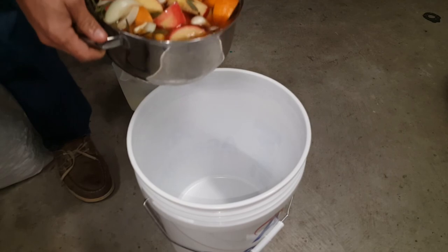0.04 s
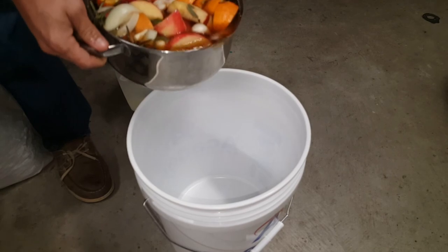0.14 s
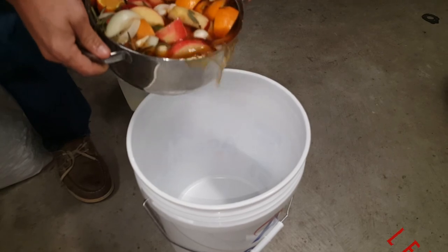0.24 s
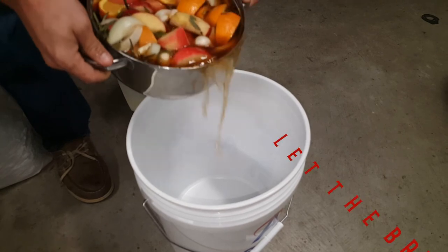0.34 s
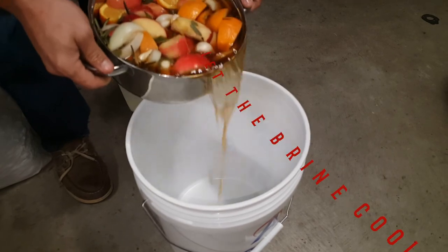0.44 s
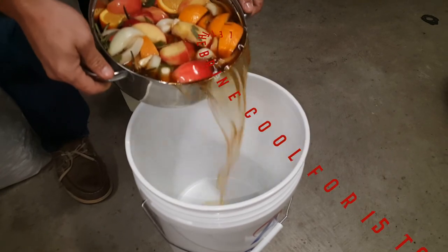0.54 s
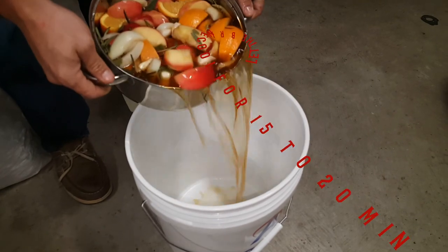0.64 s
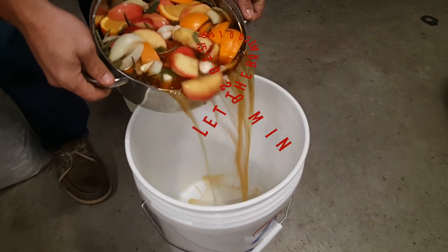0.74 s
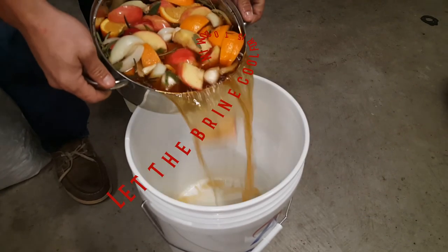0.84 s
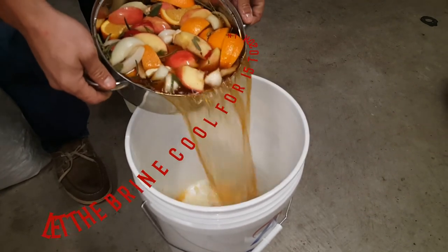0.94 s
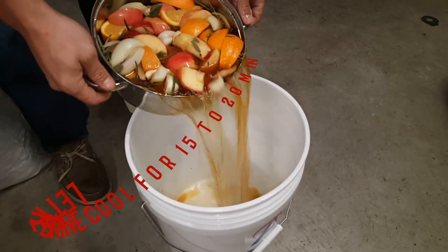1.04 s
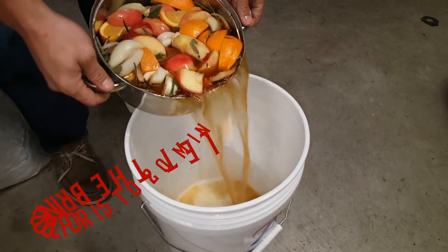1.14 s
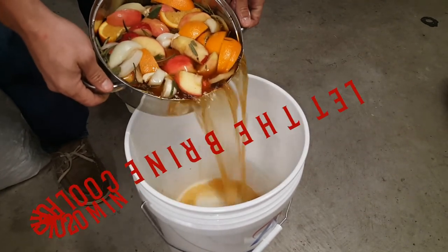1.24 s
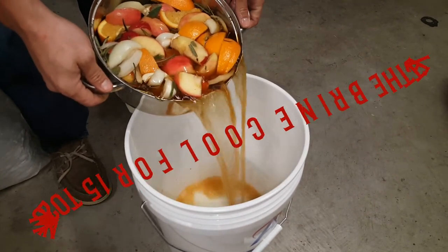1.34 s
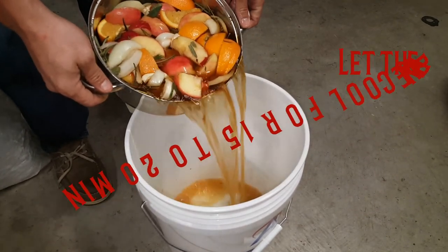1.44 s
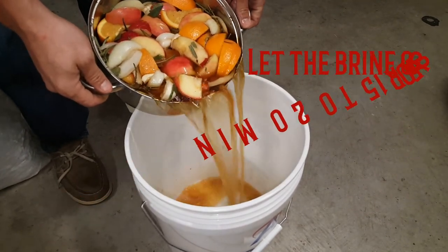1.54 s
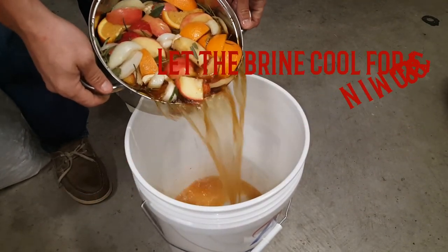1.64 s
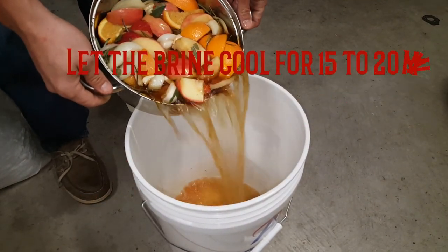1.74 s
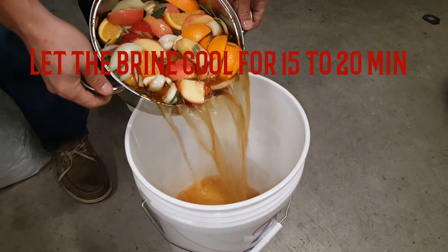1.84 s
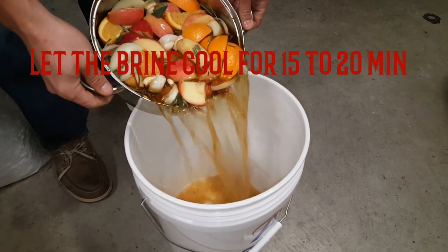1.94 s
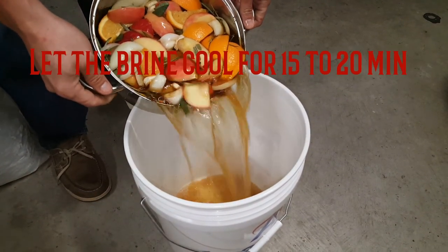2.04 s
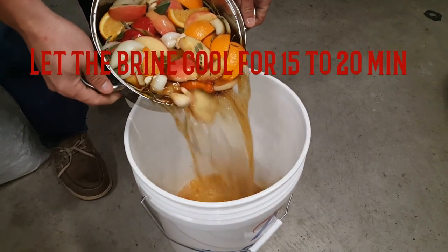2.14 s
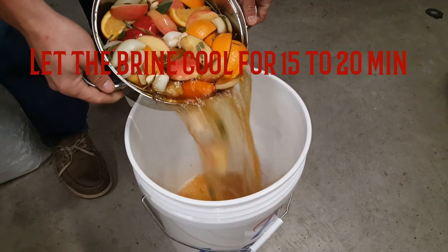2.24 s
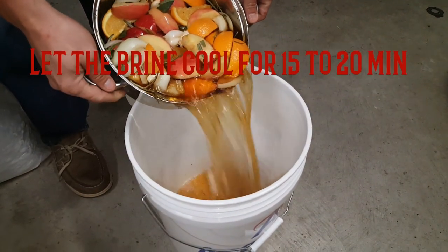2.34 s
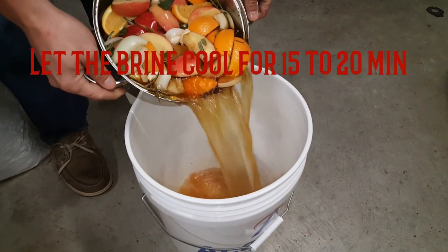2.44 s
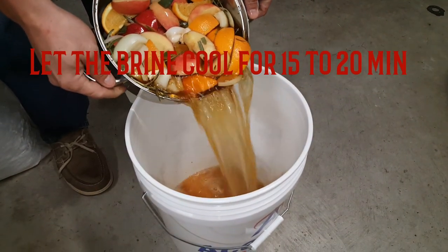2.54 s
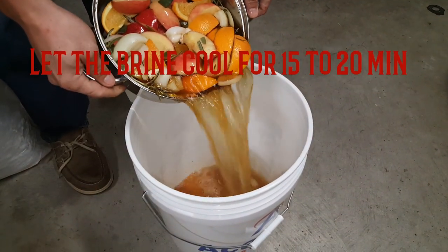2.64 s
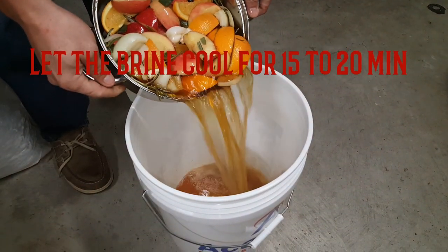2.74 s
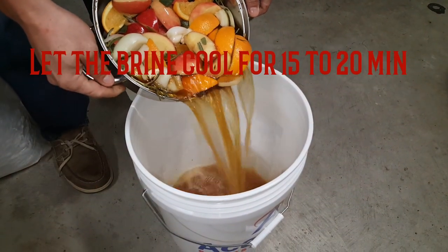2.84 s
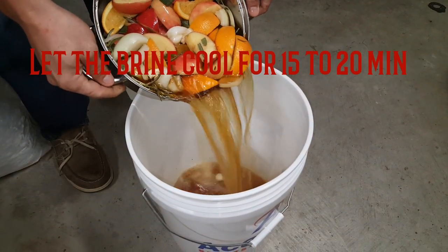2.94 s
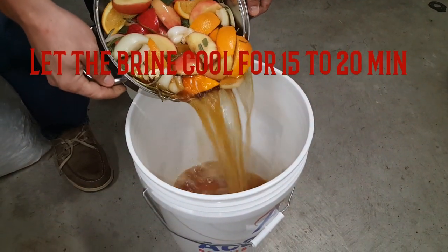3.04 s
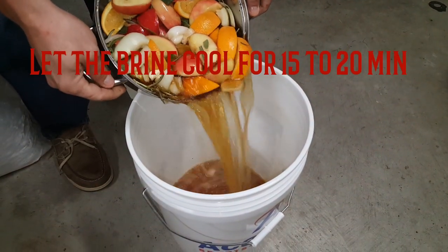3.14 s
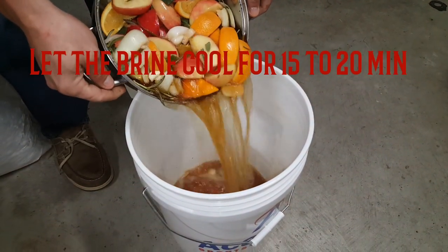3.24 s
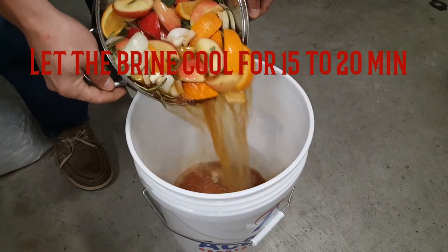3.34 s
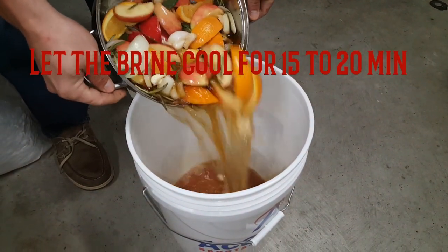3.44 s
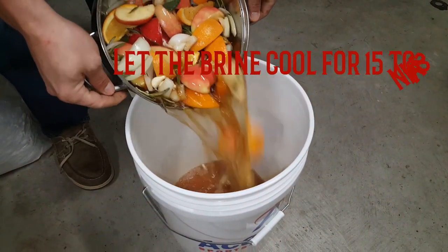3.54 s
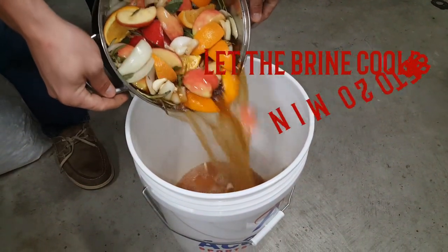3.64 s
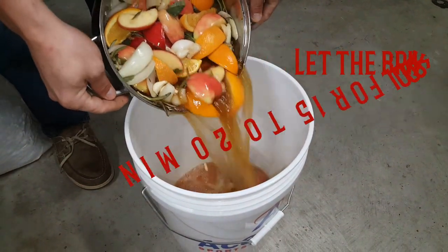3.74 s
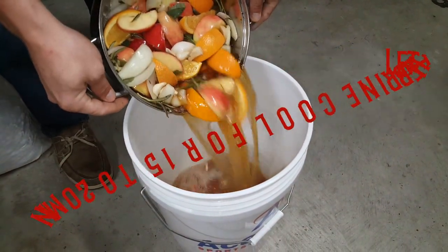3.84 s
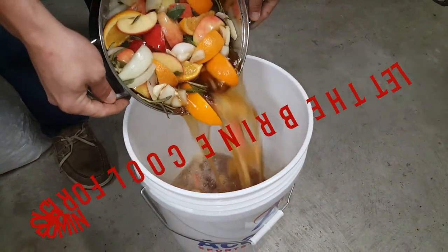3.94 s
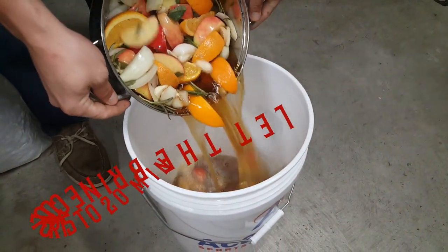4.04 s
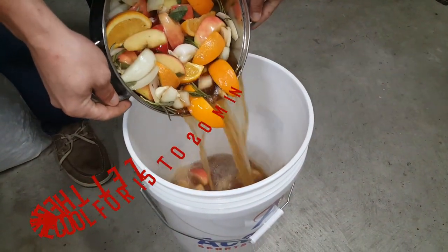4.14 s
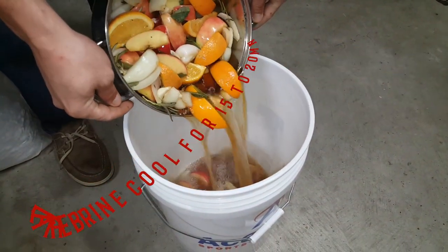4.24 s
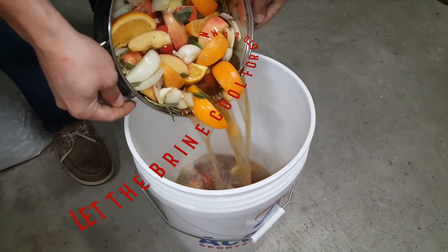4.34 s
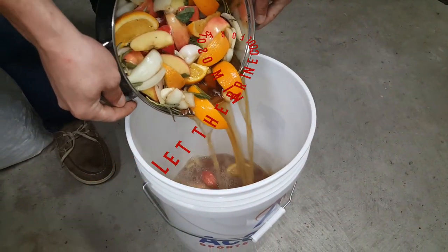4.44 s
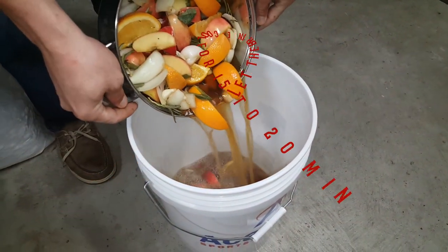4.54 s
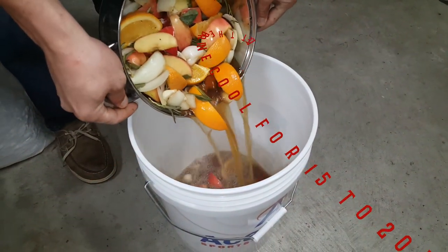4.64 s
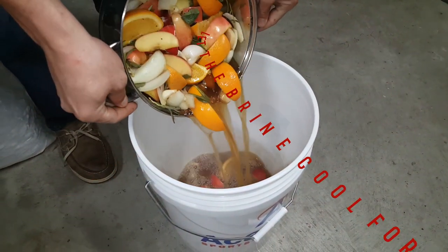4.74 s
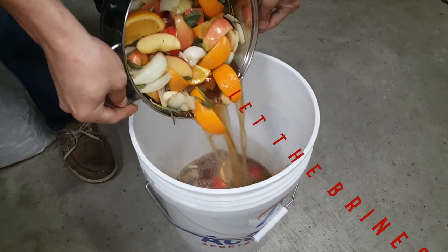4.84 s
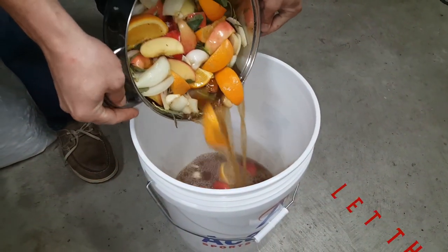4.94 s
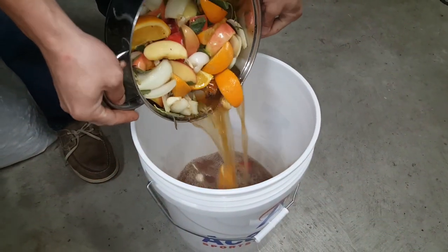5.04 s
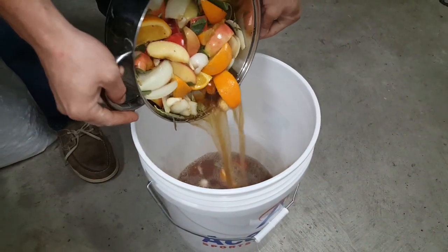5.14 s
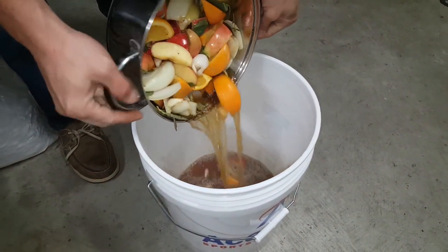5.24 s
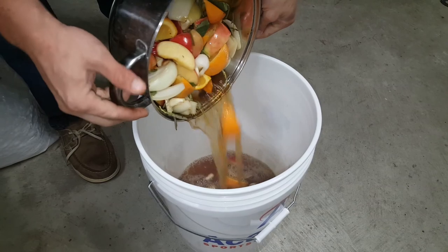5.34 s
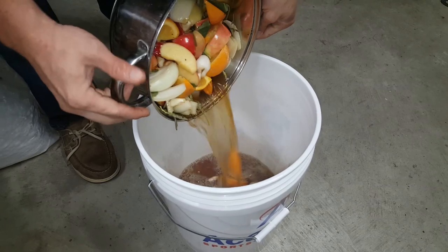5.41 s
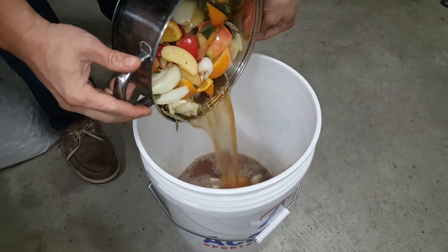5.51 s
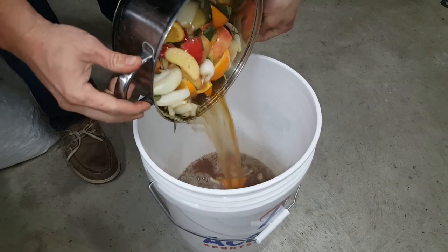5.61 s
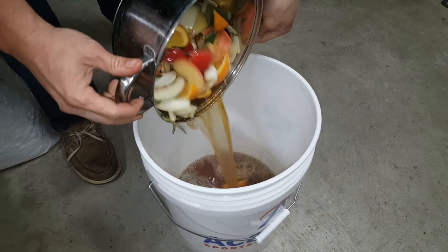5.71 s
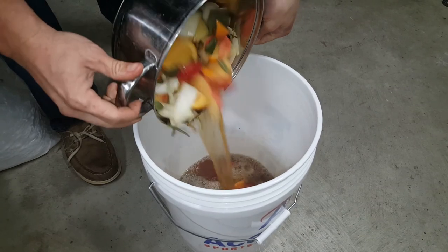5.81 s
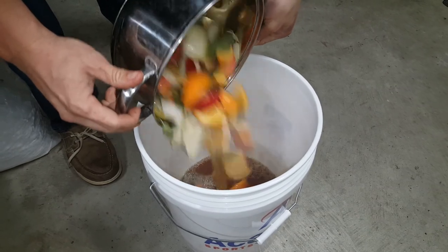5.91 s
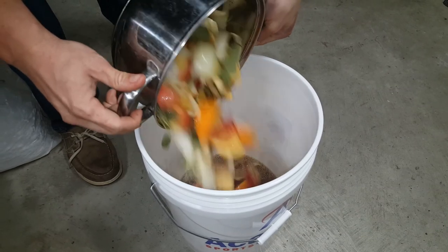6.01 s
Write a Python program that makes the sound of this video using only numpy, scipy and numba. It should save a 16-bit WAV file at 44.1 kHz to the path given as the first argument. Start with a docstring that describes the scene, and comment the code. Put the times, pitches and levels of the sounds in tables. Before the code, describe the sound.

Close above a plastic bucket on a concrete floor, an uneven stream of brine starts suddenly, crackling and drumming on the hollow base. Chunks of fruit drop in with deep thuds and rounded gulps, the heaviest around the first, middle and later seconds. Splashes, fine spray and bubbling continue as liquid gathers, then the pour thins to lighter slaps. A quiet low hum and short hard-walled echo surround it.

```python
"""In a bare workroom, brine with fruit chunks is poured from a pot into a plastic bucket on a concrete floor.
The broken stream and thudding chunks excite the bucket's modes; trapped air plops, hums and gurgles.
Slaps, snaps and spray are shaped noise bursts, flickering hiss and tiny gliding tones.
A low noise hum fills the room, whose hard walls return an echo; two ports above hear it all."""
import sys
import numpy as np
from scipy import signal
from scipy.fft import rfft, irfft
from scipy.io import wavfile
from scipy.ndimage import uniform_filter1d
from numba import njit

SR = 44100
rng = np.random.default_rng(int(sys.argv[2]) if len(sys.argv) > 2 else 0)


def digitize_waveform(pressure):
    """Quantize a signal to 16-bit integers and store it at the path in sys.argv[1].

    Rows of a 2-D input are taken as channels; values are limited to [-1, 1].
    """
    field = np.atleast_2d(pressure).T
    bounded = np.clip(field, -1, 1)
    quanta = np.round(bounded * 32767).astype(np.int16)
    wavfile.write(sys.argv[1], SR, quanta)


N = 267687
T = np.arange(N) / SR


def undb(db):
    """Decibels express the logarithm of an amplitude ratio; return the ratio."""
    return 10 ** (np.asarray(db) / 20)


def level(x, db):
    """Root-mean-square scaling: bring the signal's rms to a level in dB."""
    return x * undb(db) / np.sqrt(np.mean(x ** 2))


def pan(db):
    """Level-difference stereo: the gains of left and right, a given number of dB apart."""
    return undb(np.array([db, -db]) / 2)


def decay(t, t60):
    """Exponential decay: the amplitude falls by 60 dB in t60 seconds."""
    return np.exp(-np.log(1000) * t / t60)


def colour(x, table):
    """Spectral shaping: weight each frequency by (Hz, dB) points joined on a logarithmic axis."""
    hz, db = np.transpose(table)
    f = np.maximum(np.fft.rfftfreq(N, 1 / SR), 1)
    gain = undb(np.interp(np.log(f), np.log(hz), db))
    return irfft(rfft(x) * gain, N)


def band(x, hz, width):
    """Band-pass filtering: keep a band around hz, its width in octaves, its edges kept in range."""
    edges = np.clip(hz * 2 ** (np.array([-.5, .5]) * width), 20, [19000, 20000])
    return signal.sosfilt(signal.butter(1, edges, "band", fs=SR, output="sos"), x)


def walk(rate):
    """Random modulation: levels held 1 / rate seconds and smoothed twice; spread near 1."""
    k = int(SR / rate)
    steps = np.repeat(rng.standard_normal(N // k + 1), k)
    return 1.6 * uniform_filter1d(uniform_filter1d(steps, k), k)[:N]


@njit
def grains(start, hz, cycles, glide, left, right, n, sr):
    """Bubble resonance: short tones that slide upward and fall by a factor e in about the given cycles."""
    out = np.zeros((2, n))
    for g in range(len(start)):
        w, z = 2 * np.pi * hz[g] / sr, 1 + 0j
        fade = np.exp(-hz[g] / (cycles[g] * sr))
        size = int(5 * cycles[g] * sr / hz[g])
        for i in range(start[g], min(start[g] + size, n)):
            out[0, i] += left[g] * z.imag
            out[1, i] += right[g] * z.imag
            z *= fade * np.exp(1j * w)
            w *= 1 + glide / size
    return out


@njit
def mode(force, hz, fade, sr):
    """Driven damped resonance: a decaying rotating pointer whose pitch may move."""
    out, z = np.empty(len(force), np.complex128), 0j
    for i in range(len(force)):
        z = z * fade * np.exp(2j * np.pi * hz[i] / sr) + force[i]
        out[i] = z
    return out


def ring(force, modes, bends):
    """Modal superposition: a force excites every mode; filling shifts their balance, bends move their pitch."""
    fill, out = (T / T[-1]) ** 0.5, 0
    for (hz, t60, empty_db, filled_db, pan_db, lead), bend in zip(modes, bends):
        tone = mode(force, hz * bend, decay(1 / SR, t60), float(SR))
        phases = np.exp(.5j * lead * np.array([[1], [-1]]))
        ports = pan(pan_db)[:, None] * (tone * phases).imag
        out = out + ports * undb(empty_db + fill * (filled_db - empty_db))
    return out / 2


# Spectrum of the room's hum.
# Each row: frequency in Hz, relative density in dB per Hz.
HUM_SPECTRUM, ROOM_DB = [(35, -45), (60, -19), (85, 9), (146, 4), (197, -6), (307, -2), (388, -8),
                         (564, -7.5), (987, -14), (1160, -18), (2080, -19), (10700, -39), (14400, -41),
                         (15900, -33)], -51.5


def workroom():
    """Ambient noise field: a steady, mostly low hum, less alike at the two ports around 1 to 9 kHz."""
    mid, side = (colour(rng.standard_normal(N), HUM_SPECTRUM) for _ in range(2))
    side = 1.2 * band(side, 3000, 3.3)
    return level(np.array([mid + side, mid - side]), ROOM_DB)


STREAM_START_S = .575
# Course of the pour.
# Each row: time in seconds, then relative levels in dB: drumming of the base, rattle of the walls, spray.
POUR_LEVELS = [(.585, -53, -31, -65), (.63, -24, -26.5, -40), (.7, -24, -27, -41),
               (0.74, -26, -23.5, -33.5), (0.87, -26, -28, -33.5), (1.13, -27, -24.5, -31),
               (1.76, -29.5, -37, -33.5), (2.0, -27.5, -29, -30), (2.18, -28.5, -28.5, -28),
               (2.55, -22.5, -36.5, -27.5), (2.91, -28, -34.5, -29), (3.2, -32.5, -32, -28),
               (3.46, -38, -35.5, -29.5), (3.66, -30.5, -32.5, -27.5), (3.93, -23.5, -38.5, -28),
               (4.26, -33, -33, -27), (4.91, -36.5, -36, -33.5), (5.33, -32, -36, -32),
               (5.59, -36, -37.5, -32), (5.79, -44, -41.5, -33), (6.07, -61, -41.5, -38.5)]


def stream_levels():
    """Time-varying excitation: base, wall and spray levels in dB, practically silent before the start."""
    s, *columns = np.transpose(POUR_LEVELS)
    return [np.where(T < STREAM_START_S, -200, np.interp(T, s, column)) for column in columns]


def patter(share, scatter_db):
    """Random impulse train: drops of uneven size hit at random samples; rms 1."""
    size = undb(scatter_db * rng.exponential(size=N)) * rng.standard_normal(N)
    return level(size * (rng.random(N) < share), 0)


def drumming(base_db, walls_db):
    """Random impact excitation: the force of the wobbling stream on the base and on the walls."""
    wobble = walk(22.355)
    base_drops, wall_drops = patter(.08, 1.2), patter(.08, 1.5)
    base = base_drops * undb(base_db - 25.5 + 0.94 * wobble)
    walls = wall_drops * undb(walls_db - 27.0 + 0.65 * wobble + 1.66 * walk(40))
    return np.array([base, walls])


# Modes of the bucket's base and walls.
# Each row: frequency in Hz, t60 in seconds, relative level empty in dB, relative level filled in dB,
# left minus right in dB, phase by which left leads in radians.
BASE_MODES = [(159.6, 0.21, 1.5, -6, -1.5, .1), (203, 0.32, -5.5, -1, 0, 0.1),
              (220, 0.35, -13.5, 0, -1.5, 0.11), (267, 0.38, -12, -16.5, 7, .1),
              (315.7, 0.78, -27, -24.5, 1, .2)]
WALL_MODES = [(461.8, 0.41, -19, -13, 6, 0.48), (569.5, 0.065, -1.5, -8, 9, 0.76),
              (661, 0.025, -22, 9, 8, 0.55), (780, 0.066, -12, 7, 3, 0.63),
              (848, 0.052, 1, -1.5, 9.5, 1.27), (941.3, 0.064, 3.5, 1, -1.5, 1.22),
              (1024, 0.035, 3.5, 0.5, -2.5, 1.2), (1220, 0.032, -4, 0, -7, 1.6),
              (1350, 0.035, -9, 4, -9.5, 1.3)]
# Pitch drift of all base modes together, as a reference hum.
# Each row: time in seconds, pitch in Hz.
BASE_HUM = [(.6, 211), (1, 205.3), (1.7, 210.5), (2.1, 208.4), (2.4, 197.5), (2.7, 205.8), (3.3, 205),
            (3.9, 211), (4.3, 212.5), (5.3, 217), (6.07, 213.6)]
HUM_REST_HZ = 211  # the reference pitch at which the base modes are unbent
# Sinking mode: starting pitch, the pitch it tends to, rate of sinking per second squared, decay.
SAG_HZ, SAG_END_HZ, SAG_PER_S2, SAG_T60_S = 200, 59.4, 0.437, 0.26
# Strength of the sinking mode.
# Each row: time in seconds, gain over the drumming force in dB.
SAG_GAIN = [(.6, -18), (1.3, -17), (1.9, -3.5), (2.4, -17), (2.7, -18), (6.07, -19)]


def bucket(stream, blows):
    """Mass-loaded resonance: base and walls ring, and one stream-driven mode sinks as liquid weighs on it."""
    base_force, walls_force = stream + blows
    drift = np.interp(T, *np.transpose(BASE_HUM)) / HUM_REST_HZ
    # the sloshing liquid bends each mode separately
    base = ring(base_force, BASE_MODES, [drift + 0.017 * walk(7) for _ in BASE_MODES])
    walls = ring(walls_force, WALL_MODES, [1 + 0.016 * walk(11) for _ in WALL_MODES])
    poured_s = np.maximum(T - STREAM_START_S, 0)
    sag_hz = SAG_END_HZ + (SAG_HZ - SAG_END_HZ) / (1 + SAG_PER_S2 * poured_s ** 2)
    sag = mode(stream[0], sag_hz, decay(1 / SR, SAG_T60_S), float(SR)).imag
    sag = sag * undb(np.interp(T, *np.transpose(SAG_GAIN)))
    return base + sag + walls


# Spectrum given to both hiss and fizz, after dulling and before their levels are set.
# Each row: frequency in Hz, relative weight in dB.
SPRAY_SPECTRUM = [(710, -13), (1200, -12), (1370, -8), (1680, -10), (1770, -8.5), (3570, 0.5), (8390, 4.5),
                  (10300, 0.5), (13900, 4.5), (15000, -8), (15900, -26)]
DULLING_DB = -4.5  # tilt per octave about 3500 Hz, reached at the end


def dulling(progress, hz):
    """Spectral tilt: deeper liquid sounds duller; progress runs from 0 to 1."""
    return undb(DULLING_DB * progress * np.log2(hz / 3500))


def spray(spray_db, count=11000):
    """Modulated noise and bubble resonance: hiss flickers band by band under a wash of tiny bubbles."""
    hiss, gush = 0, walk(16)
    for hz in 1200 * 2 ** np.arange(0, 4, .5):
        mid, left, right = (band(rng.standard_normal(N), hz, 0.64) / np.sqrt(hz) for _ in range(3))
        flicker = undb(0.82 * gush + 0.59 * walk(30))
        hiss = hiss + flicker * dulling(T / T[-1], hz) * (0.3 * mid + np.array([left, right]))
    hiss = level(colour(hiss, SPRAY_SPECTRUM), -0.21)
    when, pitch, life, side, luck = rng.random((count, 5)).T
    hz = 1100 * 2 ** (3.1 * pitch)
    # a few bubbles are much louder, by 14 dB at most
    size = undb(np.minimum(-2.8 * np.log(luck), 14)) * dulling(when, hz)
    left, right = size * np.cos(2.39 * side), size * np.sin(2.5 * side)
    start, cycles = (when * N).astype(np.int64), 3 + 30 * life ** 4
    fizz = grains(start, hz, cycles, .04, left, right, N, float(SR))
    fizz = level(colour(fizz, SPRAY_SPECTRUM), -1.3)
    clumps = undb(1.8 * walk(35) + 0.71 * gush)
    return (hiss + clumps * fizz) * undb(spray_db - 2.0)


def gurgle(base_db, count=700):
    """Bubble resonance: air dragged under by the stream comes up as low, gliding bubbles."""
    when, pitch, life, strength = rng.random((count, 4)).T
    size = undb(12 * strength - 4.0 * pitch)
    start, hz = (when * N).astype(np.int64), 150 * 2 ** (2.4 * pitch ** 1.3)
    rising = grains(start, hz, 3.7 + 5 * life, 0.414, size, size, N, float(SR))
    return level(rising, -38.0) * undb(base_db)


SHUDDER_HZ, SHUDDER_OCTAVES = 72, 0.83
JOLT_DB, JOLT_T60_S = -21, 0.17  # relative to a blow's base level
# Rumble under the stream.
# Each row: time in seconds, relative level in dB.
RUMBLE_LEVEL = [(0.6, -40), (0.78, -32.5), (1.09, -41), (1.88, -52), (2.4, -62), (2.72, -63), (3.43, -57),
                (3.71, -57), (6.07, -50)]


def shudder():
    """Narrow-band random vibration: the bucket rumbles on the floor under the stream and after each blow."""
    def rumble():
        once = band(rng.standard_normal(N), SHUDDER_HZ, SHUDDER_OCTAVES)
        return band(once, SHUDDER_HZ, SHUDDER_OCTAVES)

    mid, side = rumble(), rumble()
    blows = np.zeros(N)
    blows[[int(row[0] * SR) for row in LANDINGS]] = [undb(row[1] + JOLT_DB) for row in LANDINGS]
    jolts = signal.lfilter([1], [1, -undb(-60 / (JOLT_T60_S * SR))], blows)
    steady = undb(np.interp(T, *np.transpose(RUMBLE_LEVEL)) + 0.88 * walk(15.0))
    gain = steady * (T > STREAM_START_S) + jolts
    # almost the same at both ports
    ports = np.array([1.1 * mid + 0.15 * side, 1.3 * mid - 0.12 * side])
    return level(ports, 12.1) * gain


# Slaps of liquid on liquid.
# Each row: start in seconds, relative level in dB, colour in Hz, left minus right in dB, t60 in seconds,
# rms of the broad crackle before the row's level in dB.
SLAPS = [(0.5754, -15.5, 1900, 9, 0.026, -41), (0.6192, -17.5, 1570, 4, 0.07, -20),
         (0.653, -20.5, 3700, 2, 0.067, -3), (0.721, -6.5, 4070, 3, 0.066, -8.5),
         (0.802, -5.5, 4200, 1.5, 0.05, -11), (0.818, -5, 7560, -2, 0.018, -19),
         (0.914, -16, 4280, -0.5, 0.073, -6), (0.9562, -6.5, 4170, -2, 0.036, -11),
         (1.0073, -1, 4380, 4, 0.031, -24), (1.026, -5, 4000, 0, 0.085, -15),
         (1.0997, -5.5, 2000, 0, 0.21, -26), (1.115, -3.5, 3100, 1, 0.059, -25),
         (1.25, -8, 6040, 0, 0.042, -17), (1.2707, -5, 5200, -2, 0.059, -20),
         (1.3725, -16, 4350, -4, 0.067, -2), (1.4462, -16, 1430, -1, 0.036, -5),
         (1.487, -11, 6950, 2, 0.044, -22), (1.5099, -4, 3930, -1, 0.024, -25),
         (1.527, 2, 4040, 3, 0.013, -39), (1.66, -8.5, 4770, 2, 0.049, -15),
         (1.808, -6, 6037, 4, 0.029, -31), (1.9023, -16, 4300, -1, 0.14, -8),
         (2.001, -4.5, 7600, 2, 0.032, -32), (2.0128, -8, 3680, 0, 0.1, -23),
         (2.085, -11, 5740, 3, 0.065, -24), (2.1172, -8, 3200, 5, 0.058, -8),
         (2.1772, -9.5, 2480, 4, 0.03, -2), (2.243, -7, 4300, -1, 0.098, -19),
         (2.3137, -15, 5100, -3, 0.053, -11), (2.3587, -6, 5300, 1, 0.029, -18),
         (2.461, -5.5, 3050, 7.5, 0.072, -18), (2.487, -5.5, 3700, -3, 0.05, -23),
         (2.684, -10, 3900, 5, 0.02, -13), (2.8747, -10, 4260, 0, 0.13, -23),
         (2.9206, -6.5, 4030, 1, 0.07, -25), (3.0178, -6.5, 4600, 0, 0.07, -20),
         (3.057, -7, 3230, 3, 0.056, -17), (3.108, -7.5, 3060, 2, 0.13, -26),
         (3.168, -7, 2640, 6, 0.053, -27), (3.1901, -9.5, 4200, 3, 0.16, -38),
         (3.3858, -10, 4070, 3, 0.11, -37), (3.4497, -8.5, 4000, 7, 0.068, -31),
         (3.745, -9.5, 3770, 0, 0.3, -28), (3.7802, -2.5, 4430, 4, 0.065, -23),
         (3.8436, -13, 3800, -1, 0.16, -17), (3.915, -9, 4060, 1, 0.23, -17),
         (3.994, -7, 4040, 13, 0.019, -28), (4.1603, -6, 3860, 2, 0.083, -11),
         (4.234, -9, 1430, -3, 0.06, -22), (4.2826, -7.5, 2400, 1, 0.13, -21),
         (4.429, -12.5, 2880, 2, 0.18, -26), (4.5335, -11, 4180, 4, 0.081, -13),
         (4.698, -14.5, 5000, 0, 0.022, 10), (4.8141, -12, 3600, 1, 0.026, -11),
         (4.87, -5.5, 4630, 1, 0.029, -24), (4.9232, -8.5, 7000, -2, 0.023, -16),
         (5.136, -8.5, 4200, 1, 0.039, -28), (5.1697, -13, 1920, -1, 0.068, -32),
         (5.2574, -5, 3870, -3, 0.03, 1), (5.3404, -10.5, 5140, 0, 0.13, -30),
         (5.372, -10.5, 2200, 2, 0.057, -14), (5.4663, -11, 3520, -3, 0.055, -13),
         (5.531, -12.5, 2400, 9, 0.059, -30), (5.59, -6.5, 7000, -1, 0.035, -14),
         (5.6148, -6.5, 6500, 1, 0.052, 1), (5.6953, -10, 3250, 1, 0.072, -15),
         (5.9797, -13.5, 5000, 0, 0.053, -17), (6.0146, -14.5, 1720, -1, 0.13, -16),
         (6.04, -9.5, 3900, 0, 0.061, -36)]
TICK_DB = -8.5  # first tick, relative to the slap's level


def splats(rows):
    """Transient plus decaying noise: a first tick, then a crackle, partly broad, partly at one colour."""
    out, size = np.zeros((2, N + SR)), SR // 6
    t = T[:size]
    for s, slap_db, hz, pan_db, t60, broad_db in rows:
        noise = rng.standard_normal((3, size)) * undb(2 * rng.exponential(size=size))
        noise = 0.073 * noise[0] + noise[1:]
        gathered = level(band(noise, hz, 0.94), -11.0)
        broad = level(band(noise, 5240, 7.9), broad_db) * (1 - np.exp(-t / 0.01))
        burst = (gathered + broad) * decay(t, max(t60, .01)) * (1 - np.exp(-t / 0.0029))
        i = int(s * SR)
        out[:, i:i + size] += undb(slap_db) * pan(pan_db)[:, None] * burst
    s, slap_db, hz, pan_db, *_ = np.transpose(rows)
    left, right = undb(slap_db + TICK_DB) * pan(pan_db)
    start, cycles = (s * SR).astype(np.int64), np.full(len(s), 3.5)
    ticks = grains(start, hz, cycles, 0.27, left, right, N, float(SR))
    return out[:, :N] + ticks


# First sharp contact of the crisper gobs.
# Each row: start in seconds, relative level in dB, colour in Hz.
SNAPS = [(0.576, -25, 859), (0.618, -15.5, 853), (0.653, -15, 853), (0.803, -10, 4270), (1.373, -15, 1340),
         (1.446, -8, 848), (2.686, -13, 3580), (3.188, -12.5, 4250), (4.233, -14, 794), (4.662, -13, 1000),
         (4.923, -13.5, 2350), (5.693, -16, 2750)]
CRACK_T60_S, CRACK_OCTAVES = .014, 1.3


def cracks():
    """Impulsive noise: a sudden broad snap that dies within a few milliseconds."""
    out, t = np.zeros((2, N)), T[:SR // 40]
    for s, db, hz in SNAPS:
        noise = rng.standard_normal((3, len(t)))
        ports = noise[0] + 1.15 * noise[1:]  # partly shared by both ports
        snap = level(band(ports, hz, CRACK_OCTAVES), db - 6.0)
        out[:, int(s * SR):][:, :len(t)] += snap * decay(t, CRACK_T60_S)
    return out


# Chunks and heavy gobs landing.
# Each row: start in seconds, relative base level in dB, relative walls level in dB, base colour in Hz,
# walls colour in Hz, tumbling t60 in seconds, large pocket over base level in dB.
LANDINGS = [(0.578, -24.5, -22.5, 211, 862, 0.094, 3), (0.623, -24, -33, 213, 860, 0.073, -4),
            (0.652, -28, -31, 226, 870, 0.16, -18), (0.721, -22, -28, 214, 555, 0.16, -7),
            (0.804, -20, -31, 149, 1080, 0.39, 1.5), (0.957, -18.5, -46, 203, 536, 0.061, -31),
            (1.144, -11, -18, 245, 552, 0.12, -15), (1.171, -18, -23, 250, 475, 0.067, 4),
            (1.183, -27, -25, 253, 477, 0.092, -6), (1.206, -17, -22.5, 240, 455, .12, -6),
            (1.24, -22, -36, 201, 510, .13, -14), (1.276, -26, -35, 206, 594, 0.092, 2.5),
            (1.374, -29, -52, 200, 1330, 0.085, -4), (1.446, -17, -15.5, 243, 848, 0.3, -9),
            (1.547, -23.5, -24.5, 217, 990, 0.064, -9), (1.69, -22.5, -34, 203, 870, 1, 1.5),
            (2.432, -19.5, -30, 195, 616, .15, -19), (2.463, -17.5, -20.5, 210, 830, 0.12, -9),
            (2.514, -7.5, -14.5, 191.3, 598, 0.11, 5), (2.538, -37, -24, 200, 830, 0.068, -8),
            (2.557, -35, -27, 230, 810, 0.14, -19), (2.589, -20, -31, 178.7, 960, 0.098, 4),
            (2.656, -29, -39, 215, 1310, 0.073, -10), (2.691, -22.5, -44, 190, 1350, 0.068, -18),
            (2.815, -32, -24, 190, 804, 0.072, -4), (2.871, -25.5, -27, 178, 865, 0.11, 3.5),
            (3.117, -24, -24.5, 220, 780, 0.073, -3), (3.387, -37, -35, 183, 830, 0.15, 9),
            (3.742, -37, -26.5, 220, 1450, 1, -12), (3.788, -14.5, -24.5, 205, 830, 0.086, -3),
            (3.939, -20, -25, 207, 730, 0.16, -16), (4.183, -18.5, -16, 233, 817, 0.13, -4),
            (4.234, -13.5, -19.5, 215, 754, 0.13, 2), (4.277, -23, -26, 220, 900, 0.15, -8),
            (4.294, -16, -23, 222, 640, 0.14, -6), (4.354, -25, -27, 226, 460, 0.15, -8),
            (4.41, -21, -38, 221, 463, 0.23, -25), (4.659, -21.5, -22, 220, 970, 0.26, -9),
            (5.091, -40, -28, 192, 670, 0.043, -19), (5.267, -30, -38, 226, 537, 0.064, -7),
            (5.504, -48, -57, 205, 1340, 0.27, -5), (5.627, -29, -20, 147, 1006, 0.11, -3),
            (5.654, -28.5, -29, 210, 795, 0.03, -12), (5.697, -34, -29.5, 249, 1070, 0.1, -7),
            (5.981, -32, -43, 253, 780, 0.69, -15)]


def thuds():
    """Impact excitation: a blow favours modes near its colour; the piece tumbles and liquid closes over it."""
    force, tumble = np.zeros((2, N)), patter(.04, 1.5)
    for s, base_db, walls_db, base_hz, walls_hz, t60, _ in LANDINGS:
        i = int(s * SR)
        t = T[:min(SR // 2, N - i)]
        after = tumble[i:i + SR // 2] * decay(t, max(t60, .01))
        blow = 1. * (np.arange(len(after)) == 0)
        on_base = band(2.1 * blow + undb(-31) * after, base_hz, 0.69)
        on_walls = band(0.64 * blow + undb(-22.5) * after, walls_hz, 2.46)
        force[0, i:i + len(after)] += undb(base_db) * on_base
        force[1, i:i + len(after)] += undb(walls_db) * on_walls
    return force


SMALL_POCKET_DB = 0.5  # over the walls level


def plops():
    """Closing-cavity resonance: each landing opens a large and a small air pocket, both rising in pitch."""
    s, base_db, walls_db, base_hz, walls_hz, _, gulp_db = np.transpose(LANDINGS)
    start = (s * SR).astype(np.int64)
    large, small = undb([base_db + gulp_db, walls_db + SMALL_POCKET_DB])
    gulp = grains(start, .85 * base_hz, 3.9 + 0 * s, 0.915, large, large, N, float(SR))
    # the small pocket sounds 130 samples later
    return gulp + grains(start + 130, .95 * walls_hz, 8.4 + 0 * s, 0.222, small, small, N, float(SR))


# Short hums at the bucket's pitch: hollows opened by chunks, and brief swells of the stream's hum.
# Each row: start in seconds, held time in seconds, starting pitch in Hz, starting level in dB (relative).
HUMS = [(.623, 0.021, 204, -19), (.676, 0.016, 192, -20), (1.145, 0.018, 225, -5.5), (1.17, .009, 247, -9),
        (1.196, 0.026, 235, -12), (1.272, 0.0196, 205, -17.5), (1.365, .035, 205, -26),
        (1.24, 0.021, 214, -19.5), (1.4462, .004, 870, -2), (1.689, 0.065, 206, -23.5),
        (1.96, 0.13, 200, -25), (2.17, 0.052, 198, -23), (2.241, 0.069, 194, -21), (2.514, 0.018, 212, -13),
        (2.535, 0.011, 220, -8), (2.955, 0.027, 206, -27.5), (3.279, 0.077, 200, -26.5),
        (3.79, 0.03, 207, -12.5), (3.94, 0.029, 207, -6), (3.98, 0.054, 208, -14.5),
        (4.069, 0.055, 214, -23), (4.237, 0.027, 210, -4.5), (4.294, 0.053, 211, -5.5),
        (4.354, 0.027, 220, -12.5), (5.266, .036, 217, -20), (5.629, 0.011, 764, -16)]
HUM_ONSET_S, HUM_STOP_S = 0.002, 0.00097  # time constants
HUM_RISE, HUM_FADE_DB = 0.046, -3  # fraction of pitch, and dB, over the held time


def hums():
    """Sustained resonance: a short tone holds, fading and rising a little, then stops abruptly."""
    out, t = np.zeros(N), T[:SR // 8]
    for s, length, hz, db in HUMS:
        onset = 1 - np.exp(-t / HUM_ONSET_S)
        stop = np.exp(-np.maximum(t - length, 0) / HUM_STOP_S)
        tone = np.sin(2 * np.pi * hz * t * (1 + HUM_RISE * t / length / 2))
        out[int(s * SR):][:len(t)] += undb(db + HUM_FADE_DB * t / length) * onset * stop * tone
    return out


# Single clear bubbles.
# Each row: start in seconds, pitch in Hz, life in cycles, relative level in dB.
CLEAR_BUBBLES = [(1.447, 567, 8, -17), (1.447, 1220, 8.6, -13), (1.468, 276, 4, -17),
                 (1.483, 270, 2.9, -21), (2.516, 620, 5.7, -16), (3.2, 600, 8.5, -29),
                 (3.382, 780, 14, -28), (3.452, 1313, 30, -26.5), (3.5, 776, 13, -24.5),
                 (3.558, 1284, 18, -29), (3.612, 755, 28, -28.5), (3.67, 764, 25, -31.5),
                 (3.735, 1313, 25, -22.5), (3.782, 970, 11, -23), (3.95, 770, 27, -23.5),
                 (4.165, 1270, 16, -21.5), (4.662, 990, 20, -33), (4.735, 3570, 25, -28),
                 (4.81, 3590, 22, -29), (4.845, 780, 57, -34.5), (5.088, 698, 7, -26),
                 (5.255, 3260, 21, -26), (5.372, 2270, 22, -30), (5.375, 1385, 26, -27)]
BUBBLE_RISE = 0.054  # pitch glide over a bubble's whole tone, as a fraction


def bubbles():
    """Bubble resonance: trapped air rings clearly and rises a little."""
    s, hz, cycles, db = np.transpose(CLEAR_BUBBLES)
    start = (s * SR).astype(np.int64)
    return grains(start, hz, cycles, BUBBLE_RISE, undb(db + 1.5), undb(db - 0.5), N, float(SR))


ROOM_T60_S, ECHO_DB = 0.71, -10


def echo(x):
    """Diffuse reverberation: hard walls return a dense, decaying tail, different at each port."""
    t = T[:SR // 2]
    tail = rng.standard_normal((2, len(t))) * decay(t, ROOM_T60_S) * (t > .006)
    tail = band(tail, 3350, 2.6)
    tail /= np.sqrt(np.sum(tail ** 2, axis=1, keepdims=True))
    return undb(ECHO_DB) * signal.fftconvolve(x.mean(0)[None], tail, axes=1)[:, :N]


def scene():
    """Linear superposition: bucket and liquid, their echo, and the room."""
    base_db, walls_db, spray_db = stream_levels()
    stream = bucket(drumming(base_db, walls_db), thuds()) + gurgle(base_db) + spray(spray_db) + shudder()
    tones = plops() + hums() + bubbles()
    pour = stream + tones + splats(SLAPS) + cracks()
    return pour + echo(pour) + workroom()


# Colour difference between the two ports.
# Each row: frequency in Hz, left minus right in dB.
PORT_COLOUR = [(100, 2), (200, 3), (380, -3.5), (700, -2.5), (1290, 4), (2380, 4), (4400, 2), (8120, -2.5),
               (15000, -1)]
BASS_CUT_HZ, TOP_HZ = 144.7, 15500


def record(dry):
    """Filtering and soft saturation: bass is cut, peaks are rounded, the ports are coloured, top is cut."""
    dry = signal.sosfilt(signal.butter(3, BASS_CUT_HZ, "high", fs=SR, output="sos"), dry)
    dry = 1.1 * np.tanh(dry / 1.1)
    ports = [colour(x, [(hz, sign * db / 2) for hz, db in PORT_COLOUR]) for x, sign in zip(dry, (1, -1))]
    return signal.sosfilt(signal.ellip(10, .2, 80, TOP_HZ, fs=SR, output="sos"), ports)


dry = scene()
out = record(dry)
digitize_waveform(out)
```